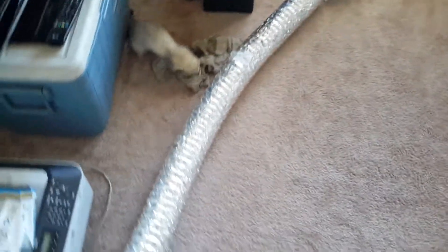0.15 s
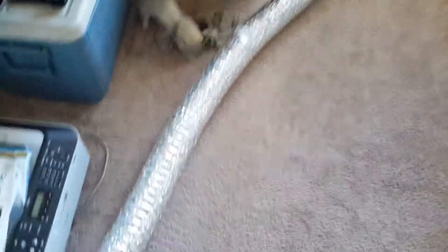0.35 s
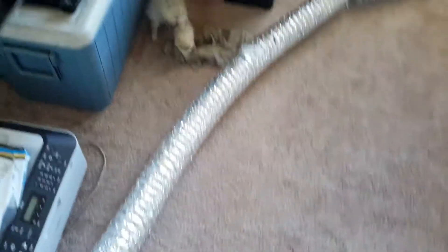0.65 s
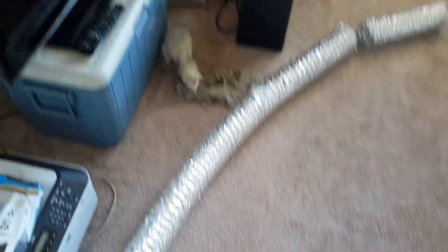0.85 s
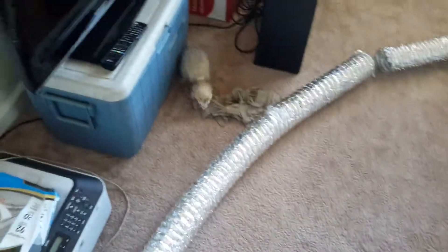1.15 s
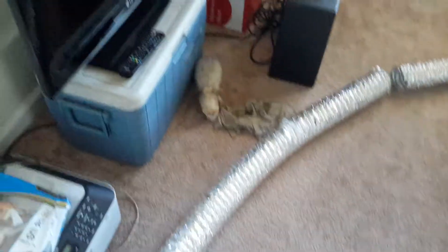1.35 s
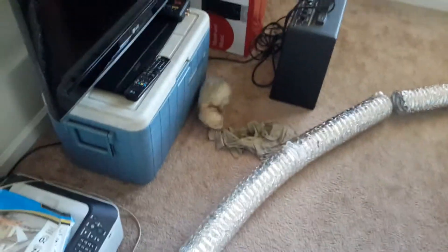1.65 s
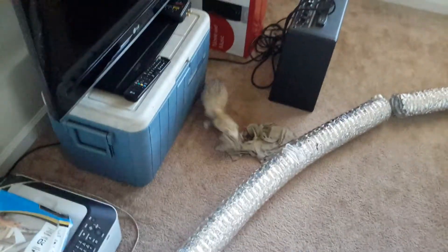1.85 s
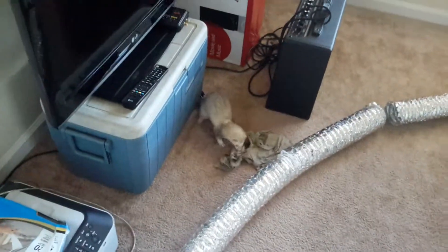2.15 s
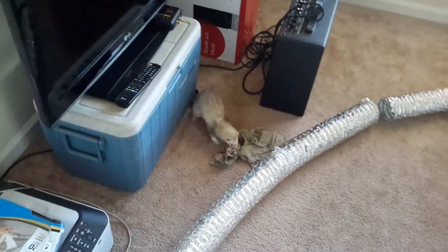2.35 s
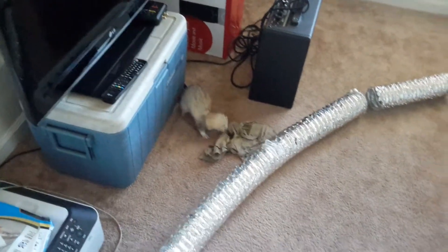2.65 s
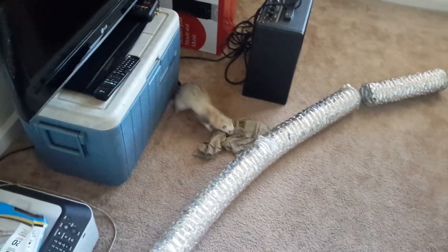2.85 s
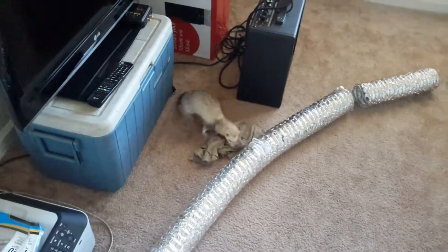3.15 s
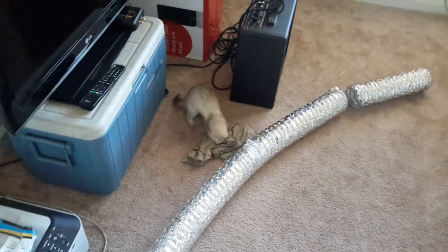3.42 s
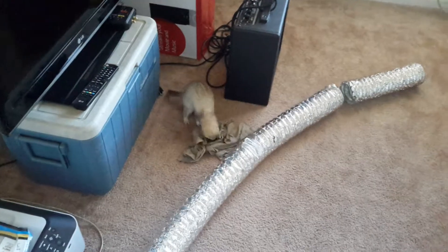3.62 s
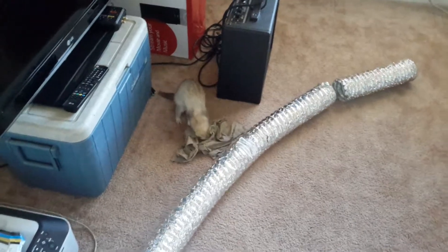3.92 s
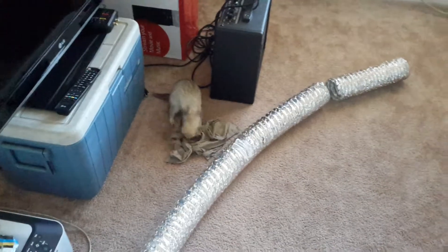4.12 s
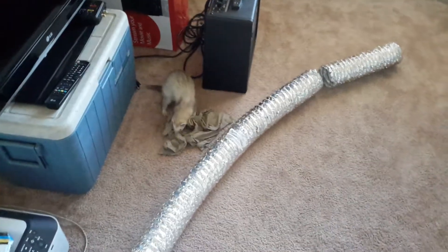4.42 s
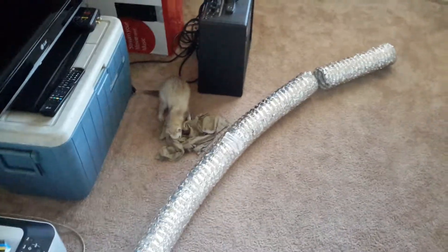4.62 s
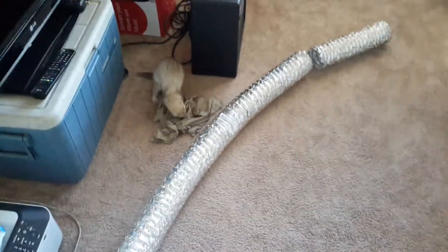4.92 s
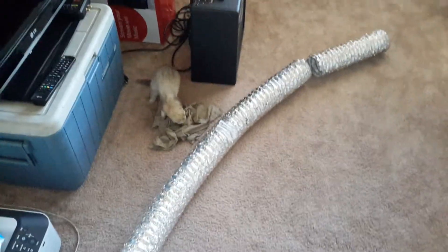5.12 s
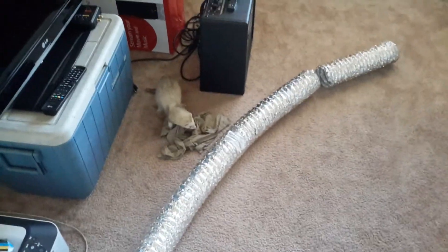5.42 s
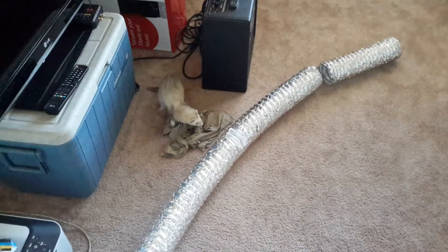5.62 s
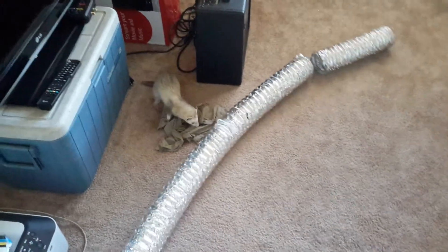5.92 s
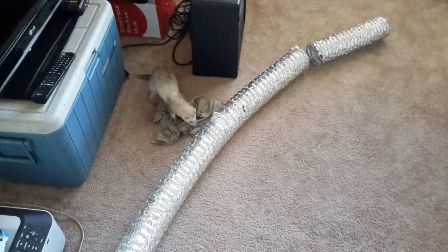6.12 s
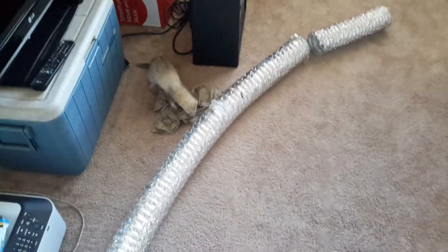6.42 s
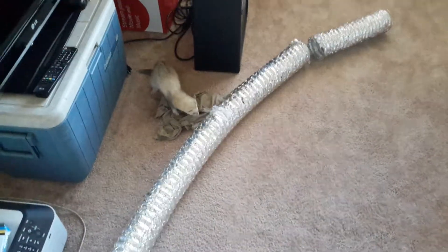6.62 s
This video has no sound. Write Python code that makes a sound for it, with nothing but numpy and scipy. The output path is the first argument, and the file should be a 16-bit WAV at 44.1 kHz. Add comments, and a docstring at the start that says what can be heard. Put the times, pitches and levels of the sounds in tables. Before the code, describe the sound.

In a small carpeted room, small animals scramble through a flexible foil duct. After a nearly silent start, bright irregular crinkles, sharp snaps and soft hollow paw bumps build into a busy scurry, with a fine hiss of sliding fur. It falls to near silence for about a second, then a loud snap begins a second, lighter burst. Hand-held microphone nearby, crisp treble, short room echo.

```python
"""In a small room, ferrets scramble through a flexible foil duct lying on the carpet.
Each step crumples the foil and bumps the hollow tube; now and then a fold snaps through or a claw scrapes the ribs.
Fine crinkles, sliding fur and scuffing fill the gaps, above faint still air. Random clicks are the raw material:
filters give them the colours of foil, wall, fur and tube, and random echo patterns place them in the room.
A hand-held microphone above adds a bright peak near 8 kHz."""
import sys
import numpy as np
from scipy import signal
from scipy.fft import rfft, irfft
from scipy.io import wavfile
from scipy.ndimage import uniform_filter1d

SR = 44100
rng = np.random.default_rng(int(sys.argv[2]) if len(sys.argv) > 2 else 0)


def dump_mix(stems):
    """Bounce the given channels to the path in sys.argv[1] as a 16-bit WAV at rate SR."""
    frames = np.atleast_2d(stems).T  # one column per channel
    limited = np.clip(frames, -1, 1)  # hard clip at full scale
    pcm = np.round(limited * 32767).astype(np.int16)
    wavfile.write(sys.argv[1], SR, pcm)


N = 298557  # length in samples

# Steps pressing on the duct; levels are relative, before filtering and echoes:
# (t/s, duration/s, crumpling foil level/dB, wall ring level/dB, paw bump level/dB)
STEPS = [(0.337, 0.053, -72, -84, -77), (0.499, 0.059, -67.5, -75.5, -77.5),
         (0.722, 0.031, -51.5, -56.5, -75), (0.755, 0.013, -41, -48, -72), (0.8, 0.038, -36.5, -47.5, -71),
         (0.909, 0.0091, -39, -39.5, -69), (0.982, 0.04, -39, -49, -47.5), (1.068, 0.018, -43, -49.5, -55),
         (1.186, 0.01, -56, -52.5, -58), (1.362, 0.037, -31, -34.5, -42.5), (1.434, 0.018, -36, -45, -51),
         (1.56, 0.027, -34.5, -46, -53), (1.681, .025, -36.5, -45.5, -45.5),
         (1.704, 0.021, -27.5, -33.5, -40.5), (1.884, 0.01, -49, -64, -50), (1.969, 0.031, -40, -57, -48.5),
         (2.057, 0.034, -34, -44, -48), (2.288, 0.024, -45, -38, -43.5), (2.459, 0.017, -35, -41, -47),
         (2.569, 0.02, -37.5, -43, -46.5), (2.603, 0.016, -33, -41, -33.5),
         (2.625, 0.026, -30, -35.5, -38.5), (2.688, 0.036, -36.5, -37.5, -48.5),
         (2.776, 0.044, -36, -38, -42), (2.835, 0.01, -41, -40, -45), (2.947, 0.022, -57.5, -58, -48),
         (3.018, 0.028, -45.5, -46, -49.5), (3.071, 0.041, -38.5, -45, -50),
         (3.256, 0.038, -40.5, -40.5, -50.5), (3.434, 0.029, -42.5, -51, -48.5),
         (3.501, 0.073, -40.5, -42.5, -51.5), (3.693, 0.031, -36.5, -44, -60),
         (3.75, 0.032, -40, -47, -43.5), (3.811, 0.028, -47, -54, -48.5), (3.893, 0.021, -35, -39.5, -56),
         (4.069, 0.072, -45.5, -52, -74), (4.187, 0.033, -49, -49.5, -58), (5.484, 0.029, -52, -50.5, -70),
         (5.516, 0.032, -45.5, -47.5, -60), (5.849, 0.019, -39, -48, -56.5), (5.918, .025, -42.5, -46, -63),
         (6.152, .045, -60, -62, -52.5), (6.223, 0.028, -41.5, -45.5, -55.5),
         (6.451, 0.027, -44, -44.5, -67), (6.526, 0.024, -42.5, -46.5, -52)]
# Single folds snapping through: (t/s, relative level/dB, wall ring level re that/dB, wall ring f/Hz)
SNAPS = [(0.667, -49.5, -11, 1550), (0.7202, -42.5, -11, 2850), (0.7513, -27.5, -12, 3420),
         (0.8234, -29, -14, 4100), (0.9137, -36, -6, 2840), (0.9917, -28, -3, 2850), (1, -21, -17, 2880),
         (1.3106, -33, -5, 3000), (1.3662, -26.5, -2, 2550), (1.3798, -21, -6, 2700),
         (1.5734, -29, -13, 2500), (1.659, -26, -8, 2400), (1.9386, -16.5, -10.5, 2900),
         (2.0135, -22.5, -11, 2800), (2.0537, -22.5, -9.5, 2780), (2.22, -33, 1.5, 3370),
         (2.2928, -15, -4.5, 2360), (2.4455, -34.5, -8, 2720), (2.473, -36, -6, 3130),
         (2.582, -27.5, -4, 1890), (2.7786, -20.5, -6, 1860), (2.9655, -31, -1, 3300),
         (3.4267, -25, -10.5, 3800), (3.6384, -28.5, -23, 3750), (3.6919, -26, -4, 2600),
         (3.87, -26, -6.5, 2880), (4.0425, -35.5, -3, 4130), (4.5483, -48, -0.5, 2400),
         (5.0324, -57, -7.5, 3200), (5.299, -54.5, -5.5, 4200), (5.656, -15.5, -4.5, 3370),
         (5.6617, -28, 1, 3620), (5.8476, -31.5, -8, 2830), (5.9236, -35.5, 0, 2930),
         (6.3543, -30, -6.5, 3430), (6.4421, -33.5, -5.5, 3700), (6.5241, -28.5, -10.5, 4100)]
# Claws scraping along the ribbed wall: (t/s, duration/s, relative level/dB)
SCRAPES = [(0.337, 0.04, -76), (0.493, 0.059, -70), (1.354, 0.031, -37.5), (2.068, 0.019, -39.5),
           (2.29, 0.0082, -24), (3.885, 0.035, -46.5), (5.594, 0.035, -36.5)]
# Two scrambles with a rest between, as relative levels:
# (t/s, fur sliding on foil level/dB, duct scuffing the carpet level/dB)
SCRAMBLES = [
    [(0.0, -68, -85), (0.75, -58, -73), (0.93, -43, -59), (1.11, -48, -58.5), (1.37, -47.5, -67.5),
     (1.53, -40.5, -55), (1.87, -37, -49.5), (2.41, -41.5, -56), (2.76, -39, -55.5), (3.27, -38, -56),
     (3.69, -37.5, -52), (4.3, -38, -59.5), (4.42, -37.5, -61.5)],
    [(4.53, -65.5, -69), (4.75, -67.5, -85), (4.99, -79.5, -87), (5.36, -63.5, -77), (5.42, -49, -67),
     (5.66, -34, -57), (5.76, -44, -59), (5.95, -37.5, -55), (6.1, -39.5, -59), (6.24, -36.5, -56.5),
     (6.44, -39.5, -59.5), (6.66, -36.5, -55.5), (6.77, -45, -67)],
]

# Relative spectra of the sources: (f/Hz, density level/dB)
CREASE_SPECTRUM = [(100, -51.5), (300, -27.5), (1100, -17.5), (2500, -7.5), (4000, -5.5), (6000, 0),
                   (8000, 1.5), (10000, -7.5), (12000, -14.5), (15000, -45)]    # foil folding
WALL_SPECTRUM = [(100, -24), (250, -5.5), (600, -7.5), (1100, -6), (1600, -4.5), (2300, -1.5), (3500, 0),
                 (5500, 1.5), (8000, -20.5), (14000, -40.5)]        # duct wall shaken
THUD_SPECTRUM = [(30, -34.5), (85, -31.5), (125, -18.5), (190, -1.5), (330, -2), (550, 0), (900, -6),
                 (1600, -14), (5000, -50)]        # paw bumping the tube
SCRAPE_SPECTRUM = [(120, -26), (300, -14), (700, -4.5), (1200, -0.5), (2200, 0), (3200, -3.5), (5000, -9.5),
                   (9000, -20), (14000, -38)]    # claw on the ribs
SCUFF_SPECTRUM = [(25, -8.5), (60, -23), (95, -7.5), (140, 1.5), (300, -2.5), (550, -1.5), (1000, -4),
                  (2000, -15.5), (6000, -39.5)]      # duct on carpet
CRINKLE_SPECTRUM = [(100, -28.5), (300, -16), (1000, -9.5), (1700, -2.5), (2600, 4.5), (4000, 3.5),
                    (6000, -2.5), (9000, -8), (12000, -15), (15000, -31.5)]  # tiny creases
FUR_SPECTRUM = [(200, -13.5), (900, -18.5), (1700, -19), (2600, -13.5), (5000, 0.5), (7500, 4.5),
                (9500, -1.5), (12000, -8), (14500, -18.5)]          # fur on foil
AIR_SPECTRUM = [(20, -13), (45, -5.5), (120, -4.5), (250, -13), (600, -17), (2000, -21.5), (5000, -35.5),
                (8000, -17.5), (14500, -21.5)]          # still air of the room

# Hollow resonances of the tube: (f/Hz, bandwidth/Hz, peak gain level/dB)
TUBE_MODES = [(198, 19, 2), (293, 11, 5), (395, 3.1, 3.5)]
# Resonance of the microphone port: (f/Hz, bandwidth/Hz, peak gain level/dB)
PORT_MODES = [(7750, 830, 8.5)]
# First reflections from the furniture: (typical delay t/s, level re direct sound/dB)
REFLECTIONS = [(.0029, -12), (.0072, -15.5), (0.016, -20.5)]

# The weight comes on and goes off exponentially
STEP_ATTACK_S, STEP_RELEASE_S = 0.0035, 0.0089
STEP_CREASES_PER_S, CREASE_SPREAD_DB = 900, 2.5
# Ring of the wall patch under a step: typical pitch, and scatter from step to step
WALL_RING_HZ, WALL_RING_OCTAVES = 2754, 0.44
# Energy of the smaller creases after a snap, relative to its crack
SNAP_FLURRY_DB = -0.5
# Mean crinkle level under a firm drag, and dB gained for each dB of drag
CRINKLE_DB, CRINKLE_GROWTH, FIRM_DRAG_DB = -54.5, 1.13, -55
AIR_DB = -73
# Microphone: amplitude at which peaks saturate, and upper band limit
OVERLOAD, TOP_HZ = 0.8, 14600


def steps():
    """Forced vibration: each step crumples foil, shakes some wall patch and bumps the hollow of the tube."""
    crease, wall, bumps = np.zeros((3, N))
    for s, length_s, foil_db, wall_db, paw_db in STEPS:
        octaves = np.clip(WALL_RING_OCTAVES * rng.standard_normal(), -1, 1)
        ring_hz = WALL_RING_HZ * 2 ** octaves
        crumpling = press(length_s, STEP_CREASES_PER_S, CREASE_SPREAD_DB)
        shaking = patch(press(length_s, rate=1200, spread_db=3), ring_hz)
        bump = press(length_s, rate=1500, spread_db=0.5)
        add(crease, s, undb(foil_db) * crumpling)
        add(wall, s, undb(wall_db) * shaking)
        add(bumps, s, undb(paw_db) * bump)
    tube = resonate(colour(bumps, THUD_SPECTRUM), TUBE_MODES)
    return colour(crease, CREASE_SPECTRUM) + colour(wall, WALL_SPECTRUM) + tube


def press(length_s, rate, spread_db):
    """Loading and release: a run of clicks builds as the weight comes on, holds and dies away."""
    t = np.arange(SR // 4) / SR
    loading = 1 - np.exp(-t / STEP_ATTACK_S)
    release = np.exp(-np.maximum(t - length_s, 0) / STEP_RELEASE_S)
    return loading * release * clicks(count=len(t), rate=rate, spread_db=spread_db)


def patch(x, hz):
    """Damped resonance: every patch of wall has its own size, so its own broad ring."""
    return resonate(x, [(hz, hz / 4, 6)])


def snaps():
    """Snap-through buckling: every fold ticks brightly and shakes the wall between the wire turns."""
    crease, wall = np.zeros((2, N))
    for s, db, wall_db, ring_hz in SNAPS:
        tick = buckle(SNAP_FLURRY_DB, crack_s=0.0013, flurry_s=0.014)
        shaking = patch(buckle(SNAP_FLURRY_DB, crack_s=0.0015, flurry_s=0.013), ring_hz)
        add(crease, s, undb(db) * tick)
        add(wall, s, undb(db + wall_db) * shaking)
    return undb(16.0) * colour(crease, CREASE_SPECTRUM) + undb(17.0) * colour(wall, WALL_SPECTRUM)


def buckle(flurry_db, crack_s, flurry_s):
    """Cascading instability: one fold runs across in about a millisecond; its neighbours then give way."""
    flurry = fade(clicks(count=6000, rate=720, spread_db=5.0), flurry_s, rise_s=0.0053)
    crack = fade(clicks(count=400, rate=24000, spread_db=0.5), crack_s, rise_s=0.000161)
    sound = undb(flurry_db) * flurry
    add(sound, 0, crack)
    return sound


def scrapes():
    """Stick-slip friction: claws on the ribs make short runs of slips, duller than the snaps."""
    slips = np.zeros(N)
    for s, length_s, db in SCRAPES:
        count = int(length_s * SR)
        run = clicks(count=count, rate=1800, spread_db=2.5)
        add(slips, s, undb(db) * signal.windows.tukey(count, 0.2) * run)
    return undb(-1.5) * colour(slips, SCRAPE_SPECTRUM)


def scuffing(db):
    """Friction into a cavity: the duct drags fitfully on the carpet, heard through the hollow tube."""
    fitful_db = db - 5 + 2.05 * walk(22)
    drag = undb(fitful_db) * clicks(count=N, rate=400, spread_db=2.5)
    return resonate(colour(drag, SCUFF_SPECTRUM), TUBE_MODES)


def crinkle(drag_db):
    """Bistable creases: tiny folds flip in uneven spurts as the duct flexes; a gentle drag flips few audibly."""
    mean_db = CRINKLE_DB + CRINKLE_GROWTH * (drag_db - FIRM_DRAG_DB)
    spurts = undb(mean_db + 2.6 * walk(35))
    creases = clicks(count=N, rate=260, spread_db=4.5)
    return colour(spurts * creases, CRINKLE_SPECTRUM)


def fur(db):
    """Sliding friction: dense tiny impacts of fur on foil merge into a fine hiss."""
    hiss = colour(clicks(count=N, rate=8100, spread_db=2.5), FUR_SPECTRUM)
    return undb(db - 10.5 + 0.73 * walk(19)) * hiss


def still_air():
    """Stationary random noise: filtered Gaussian noise forms the steady background of the room."""
    return undb(AIR_DB) * colour(rng.standard_normal(N), AIR_SPECTRUM)


def room(x, count):
    """Position-dependent impulse response: sound hops between spots on the duct, each with its own echoes."""
    hold = SR // 60  # samples before each new choice of spot
    spot = np.repeat(rng.integers(0, count, N // hold + 1), hold)[:N]
    out = 0
    for k in range(count):
        share = uniform_filter1d(1. * (spot == k), size=192)  # crossfade between spots
        response = echo_pattern(wet_db=0.0, t60_s=0.29, bass_t60_s=0.31, split_hz=540, build_s=0.0033)
        out = out + signal.oaconvolve(x * share, response)[:N]
    return out


def echo_pattern(wet_db, t60_s, bass_t60_s, split_hz, build_s):
    """Reverberation: direct sound, close reflections and a short tail whose bass lingers a little."""
    t = np.arange(SR // 3) / SR
    noise = rng.standard_normal(len(t))
    bass = signal.sosfilt(signal.butter(1, split_hz, fs=SR, output="sos"), noise)
    treble = noise - bass
    tail = bass * undb(-60 * t / bass_t60_s) + treble * undb(-60 * t / t60_s)
    tail = tail * (1 - np.exp(-t / build_s))
    response = undb(wet_db) * tail / np.linalg.norm(tail)
    response[0] += 1  # direct sound
    for s, db in REFLECTIONS:
        delay_s = s * rng.uniform(0.8, 1.2)
        response[int(delay_s * SR)] += undb(db)
    return response


def clicks(count, rate, spread_db):
    """Random impulse train: rate clicks a second on average, many small and a few large; rms 1."""
    struck = rng.random(count) < rate / SR
    size = np.clip(rng.standard_normal(count), -2, 2)
    sign = rng.choice([-1, 1], count)
    return unit(struck * sign * undb(spread_db * size) + 1e-9)  # offset avoids division by zero


def walk(rate):
    """Slow random modulation: random levels, rate of them a second, joined by ramps; spread near 1."""
    k = int(SR / rate)
    held = np.repeat(rng.standard_normal(N // k + 1), k)
    return unit(uniform_filter1d(held, k)[:N])


def fade(x, seconds, rise_s=0.0001):
    """Exponential growth and decay: the sound builds up and dies away with total energy 1."""
    t = np.arange(1, len(x) + 1) / SR
    x = x * np.exp(-t / seconds) * (1 - np.exp(-t / rise_s))
    return x / np.linalg.norm(x)


def colour(x, spectrum):
    """Minimum-phase filtering: a causal response of unit energy follows the spectrum's points."""
    size = 4096
    hz, db = np.transpose(spectrum)
    grid = np.maximum(np.fft.rfftfreq(size, 1 / SR), 1)
    gain = undb(np.interp(np.log(grid), np.log(hz), db))
    cepstrum = irfft(np.log(gain))
    # Folding the cepstrum onto positive time makes the response causal
    cepstrum[1:size // 2] *= 2
    cepstrum[size // 2 + 1:] = 0
    response = irfft(np.exp(rfft(cepstrum)))
    return signal.fftconvolve(x, response / np.linalg.norm(response))[:len(x)]


def resonate(x, peaks):
    """Modal resonance: lift the sound by a given dB at the centre of each peak, one after another."""
    for hz, width, db in peaks:
        b, a = signal.iirpeak(hz, hz / width, fs=SR)
        x = x + (undb(db) - 1) * signal.lfilter(b, a, x)
    return x


def add(track, s, sound):
    """Superposition: mix a sound into a track from time s, in seconds."""
    i = max(int(s * SR), 0)
    track[i:i + len(sound)] += sound[:len(track) - i]


def undb(db):
    """Level to amplitude: 20 dB is a factor of ten."""
    return 10 ** (np.asarray(db) / 20)


def unit(x):
    """Normalisation: scale to an rms of 1."""
    return x / np.sqrt(np.mean(x ** 2))


def scene():
    """Superposition of sources: the duct in the room over still air, alike at both ears."""
    s, *columns = np.vstack(SCRAMBLES).T
    slide_db, drag_db = (np.interp(np.arange(N) / SR, s, c) for c in columns)
    impacts = steps() + snaps() + scrapes()
    friction = scuffing(drag_db) + crinkle(drag_db) + fur(slide_db)
    sound = room(impacts + friction, count=10) + still_air()
    return np.array([sound, sound])


def record(dry):
    """Port resonance, saturation and band limiting: the treble rings, loud peaks round, the top is cut."""
    ringing = resonate(dry, PORT_MODES)
    rounded = OVERLOAD * np.tanh(ringing / OVERLOAD)
    return signal.sosfilt(signal.ellip(8, 0.2, 70, TOP_HZ, fs=SR, output="sos"), rounded)


dry = scene()
out = record(dry)
dump_mix(out)
```